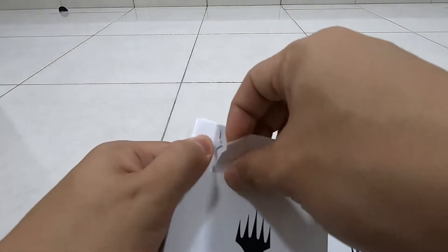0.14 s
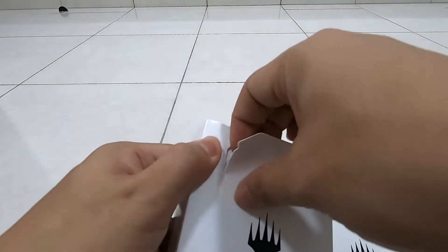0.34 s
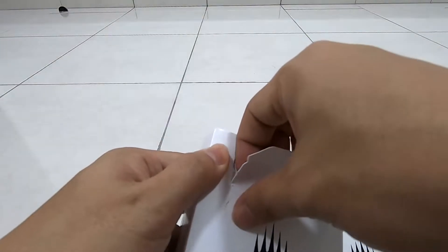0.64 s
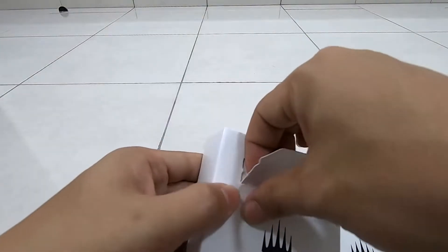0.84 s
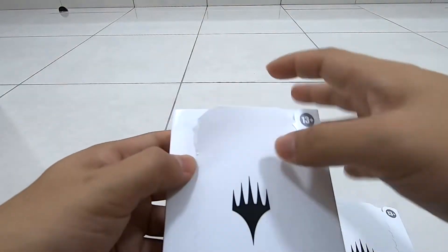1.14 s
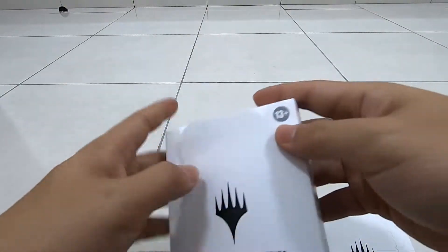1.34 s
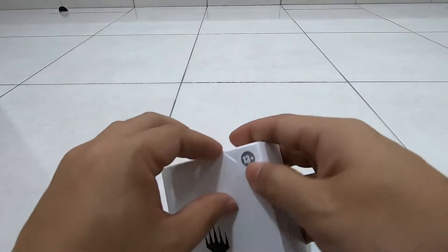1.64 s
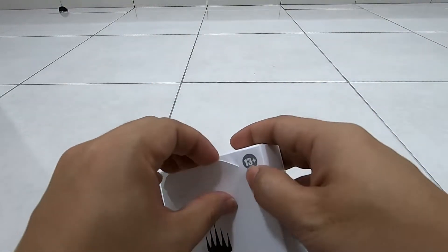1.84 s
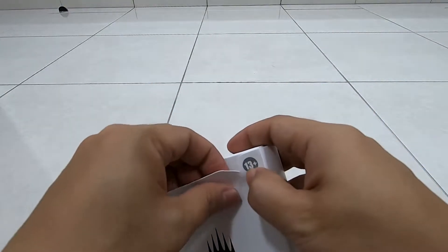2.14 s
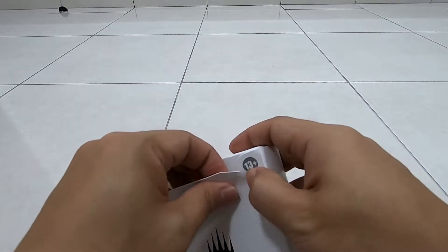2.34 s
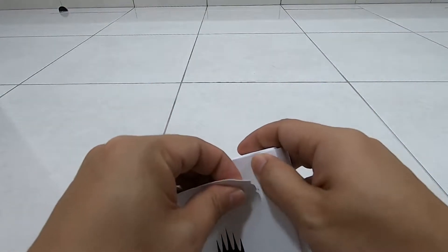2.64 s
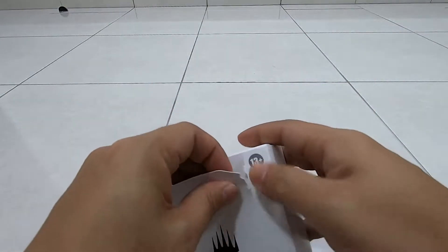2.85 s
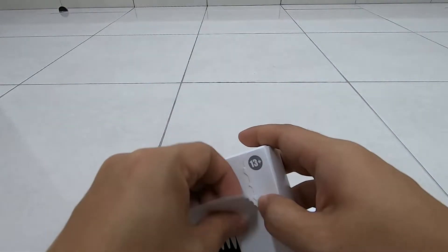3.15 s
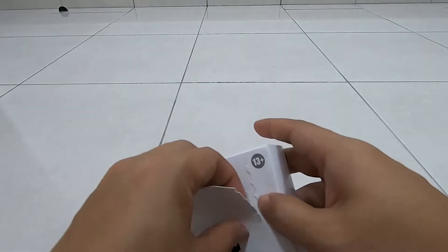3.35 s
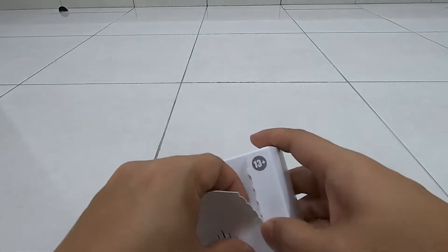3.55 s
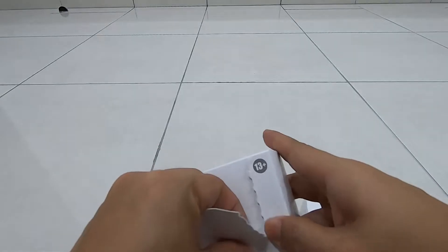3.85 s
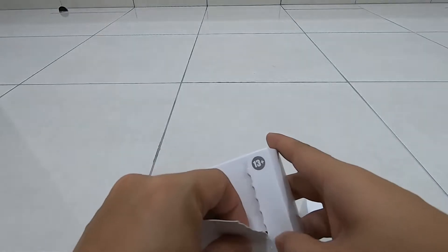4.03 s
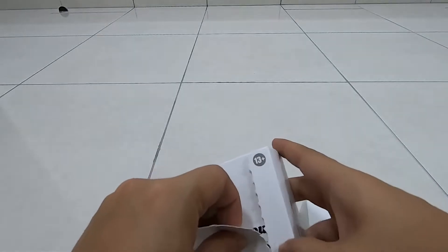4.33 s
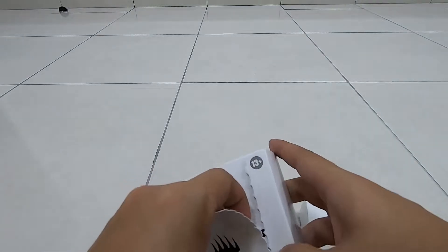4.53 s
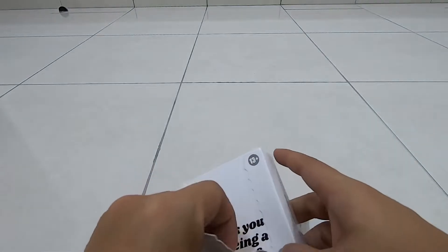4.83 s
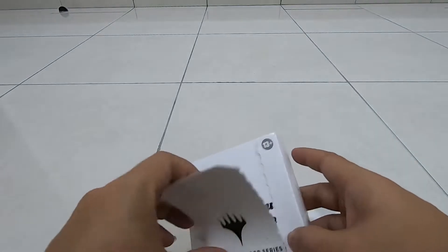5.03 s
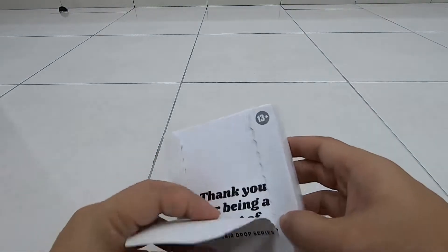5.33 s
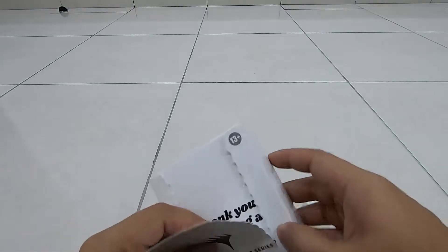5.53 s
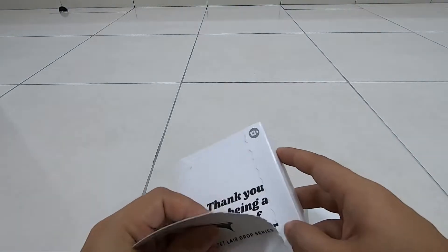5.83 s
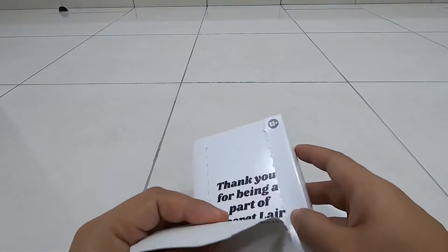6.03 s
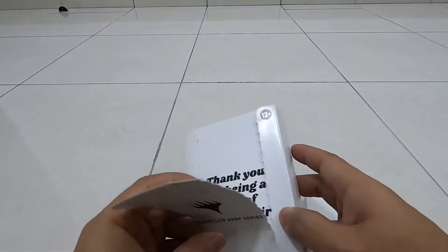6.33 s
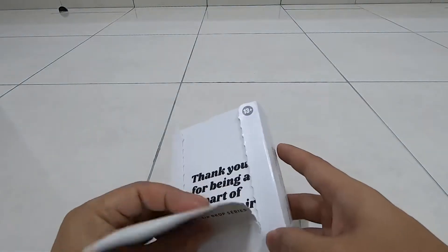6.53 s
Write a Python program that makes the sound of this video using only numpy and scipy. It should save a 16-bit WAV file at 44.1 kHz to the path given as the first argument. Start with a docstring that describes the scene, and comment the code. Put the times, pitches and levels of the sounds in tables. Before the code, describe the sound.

Hands tear a thin cardboard box open very close to the microphone in a tiled room. A rip at the start, another near one second, then fiddling and light ticks. From two and a half seconds, sharp snaps come in irregular clusters, the loudest distorting, with papery peeling, hollow thumps and bright short echoes over low hum.

```python
"""Tearing a cardboard box open

Two hands tear a thin cardboard box open along its perforation, close to a microphone in a tiled room.
Each paper tie breaks with a short burst of noise; decaying tones ring the flap and thump the box.
The loudest snaps overload the microphone. Between them, grainy noise makes fingers rub and plies peel,
small cracks make ticks, and a narrow band of noise makes the box groan, over a low room hum."""
import sys
import numpy as np
from scipy import signal
from scipy.fft import rfft, irfft
from scipy.io import wavfile
from scipy.ndimage import uniform_filter1d

SR = 44100
rng = np.random.default_rng(int(sys.argv[2]) if len(sys.argv) > 2 else 0)


def to_wav(s):
    """Save 16-bit WAV."""
    ch = np.atleast_2d(s).T  # columns
    pcm = np.round(np.clip(ch, -1, 1) * 32767)  # PCM
    wavfile.write(sys.argv[1], SR, pcm.astype(np.int16))


N = 294588  # length of the scene in samples


def amp(db):
    """Turns decibels into a plain gain."""
    return 10 ** (np.asarray(db) / 20)


def evened(x):
    """Scales a signal to an rms of 1."""
    return x / np.sqrt(np.mean(x ** 2) + 1e-20)


def read(points, hz):
    """Reads a curve between its points, along a logarithmic frequency scale."""
    f, value = np.transpose(points)
    return np.interp(np.log(hz + 1), np.log(f + 1), value)


def add(mix, s, sound):
    """Lays a sound into the mix at s seconds, cutting what runs past the end."""
    part = mix[max(round(s * SR), 0):][:len(sound)]
    part += sound[:len(part)]


def treble_octaves(hz):
    """Distance from 6 kHz in octaves, held still below 2.5 kHz and above 14 kHz."""
    return np.log2(np.clip(hz, 2500, 14000) / 6000)


def coloured(x, spectrum, tilt_db=0):
    """Gives x a spectrum, tilted by tilt_db an octave in the treble; rms 1."""
    hz = np.fft.rfftfreq(len(x), 1 / SR)
    gain = amp(read(spectrum, hz) + tilt_db * treble_octaves(hz))
    return evened(irfft(rfft(x) * gain, len(x)))


def white(size):
    """Noise with equal strength at every frequency."""
    phase = 2 * np.pi * rng.random(size // 2 + 1)
    return evened(irfft(np.exp(1j * phase), size))


def drift(hz):
    """Slow random wandering of rms 1, mostly below the given frequency."""
    f = np.fft.rfftfreq(N, 1 / SR)
    return evened(irfft(rfft(white(N)) / (1 + (f / hz) ** 4), N))


def pushes(rows, swell_s, fade_s):
    """Gain of a series of hand movements: each swells, holds for its length, then dies away."""
    t = np.arange(N) / SR
    power = np.zeros(N)
    for start, length, db in rows:
        attack = np.clip((t - start) / swell_s, 0, 1)
        release = np.exp(-np.maximum(t - start - length, 0) / fade_s)
        power += (amp(db) * attack * release) ** 2
    return np.sqrt(power)


def crackle(per_s, spread_db, length, hiss):
    """Fibres catch and pop in tiny bursts of uneven size over a little hiss; rms 1."""
    size_db = spread_db * np.minimum(rng.exponential(1, N), 3)
    pops = (rng.random(N) < per_s / SR) * amp(size_db)
    bursts = signal.lfilter([1], [1, -np.exp(-1 / (length * SR))], pops)
    return evened((evened(bursts) + hiss) * rng.standard_normal(N))


def ring(modes, size=4096, rise=0.0013):
    """Several tones start together and die away, as a struck body does."""
    t = np.arange(size) / SR
    swing = sum(amp(db - 60 * t / t60) * np.sin(2 * np.pi * hz * t) for hz, db, t60 in modes)
    return swing * (1 - np.exp(-t / rise))


# Balance of the room noise. Each row: frequency in Hz, relative level in dB.
HUM = [(12, -20), (20, -7), (38, -1.5), (58, 1.5), (80, -8), (107, -10), (204, -8), (356, -20), (387, -25),
       (421, -18.5), (1610, -34.5), (2070, -37.5), (4410, -49.5), (8880, -56), (12100, -42), (16000, -41.5)]
HUM_DB = -36.5  # rms level of that noise
# Steady tones in the room. Each row: frequency in Hz, rms level in dB before it wavers.
DRONE = [(56, -49), (117, -46.5), (153, -48), (265, -52), (355, -56.5), (469, -56.5), (596, -65)]


def hum(waver=0.63, flutter=0.4):
    """Low room noise with a few tones that waver in pitch and loudness, as of a fan."""
    t = np.arange(N) / SR
    tones = np.zeros(N)
    for hz, db in DRONE:
        loudness = amp(db) * (1 + flutter * drift(6.4))
        tones += loudness * np.sin(2 * np.pi * hz * t + waver * drift(10.0))
    return amp(HUM_DB) * coloured(white(N), HUM) + np.sqrt(2) * tones


# Hands shoving the box as they change grip.
# Each row: start in seconds, length in seconds, rumble level in dB.
JOSTLE = [(2.66,.31,-30), (5.04,0.17,-26.5), (5.26,0.04,-26.5)]
JOSTLE_SWELL_S, JOSTLE_FADE_S = 0.021, 0.014


def jostle(top_hz=50):
    """Slow pushes of the hands arrive as a deep rumble."""
    band = signal.butter(2, [14, top_hz], "band", fs=SR, output="sos")
    rumble = evened(signal.sosfilt(band, white(N)))
    return rumble * pushes(JOSTLE, JOSTLE_SWELL_S, JOSTLE_FADE_S)


# Balance of sliding card, also used for straining fibres. Each row: frequency in Hz, relative level in dB.
SLIDE = [(100, -4), (600, 3.5), (1600, -5.5), (3200, -3), (4500, -1.5), (7300, 2.5), (9500, -9),
         (12500, -2.5), (16000, -11)]
# Strokes of fingers and card sliding over each other.
# Each row: start in seconds, length in seconds, level in dB.
RUB = [(.01,0.2,-34), (.775,0.019,-46), (1.29,0.085,-43), (1.64,0.13,-56.5), (2.01,0.11,-42.5),
       (2.28,0.24,-45), (2.62,.3,-47), (3.21,0.19,-34), (3.8,0.51,-44), (4.73,0.42,-42.5),
       (5.36,0.49,-57.5), (5.64,0.13,-45.5), (5.95,0.27,-41), (6.41,0.27,-56), (6.57,0.16,-52.5)]
RUB_SWELL_S, RUB_FADE_S, RUB_REST_DB = 0.031, 0.02, -59  # the resting grip still whispers


def rub(uneven_db=2.5):
    """Skin and card slide with a fine, bright grain."""
    grain = crackle(per_s=500, spread_db=3.5, length=0.0014, hiss=1.0)
    pressure = pushes(RUB, RUB_SWELL_S, RUB_FADE_S) + amp(RUB_REST_DB)
    return coloured(grain, SLIDE) * pressure * amp(uneven_db * drift(36.0))


# The box groans as the flap is bent back.
# Each row: start in seconds, length in seconds, level in dB.
GROAN = [(3.21,0.085,-41), (4.0,0.34,-47), (6.03,0.21,-31.5)]
GROAN_SWELL_S, GROAN_FADE_S = 0.0067, 0.024


def groan(hz=275, width_hz=70):
    """Slipping card keeps a low mode of the box sounding: noise through two narrow filters."""
    b, a = signal.iirpeak(hz, hz / width_hz, SR)
    once = signal.lfilter(b, a, white(N))
    twice = signal.lfilter(b, a, once)
    return evened(twice) * pushes(GROAN, GROAN_SWELL_S, GROAN_FADE_S)


# Balance of a cracking burst. Each row: frequency in Hz, relative level in dB.
CRACK = [(100, -30), (400, 0.5), (680, -21.5), (900, -0.5), (1400, -1.5), (1900, 2), (3100, -3), (4300, 3),
         (5600, 2), (7200, 5.5), (9300, -4), (11500, 0), (14000, -5.5), (16000, -14)]


def crack(db, tilt_db, length, size=1024, rise=0.00016):
    """Fibres part in a burst of a few milliseconds that ends quickly."""
    t = np.arange(size) / SR
    shape = (1 - np.exp(-t / rise)) / (1 + (t / length) ** 4)
    return amp(db) * coloured(white(size), CRACK, tilt_db) * shape


# Modes of the flap. Each row: multiple of its pitch, relative level in dB, time to fall 60 dB in seconds.
FLAP = [(1, 3, 0.013), (.88, -1.5, 0.0046), (.66, -15, 0.0061), (.46, -4, 0.0047)]


def flap_ring(pitch):
    """The card rings at its pitch and a few lower tones."""
    return ring([(pitch * multiple, db, t60) for multiple, db, t60 in FLAP])


# Balance of the box's noise. Each row: frequency in Hz, relative level in dB.
BOX = [(60, -21), (150, -13), (250, 0), (350, -4), (480, -19.5), (700, -21), (1500, -26), (4000, -67)]
# Modes of the box. Each row: frequency in Hz, relative level in dB, time to fall 60 dB in seconds.
CAVITY = [(280, -4, 0.033), (355, -1, 0.033), (177, -14, 0.026), (503, -8, 0.021)]


def thump(db, size=4096, lag=0.00214, ring_db=3, flutter_db=-8, flutter_s=0.0079):
    """The released wall pumps the box; the grip changes its pitch a little each time."""
    t = np.arange(size) / SR
    grip = 1 + 0.0077 * rng.uniform(-1.1, 1)
    modes = ring([(hz * grip, d, t60) for hz, d, t60 in CAVITY], size=size)
    flutter_shape = np.exp(-t / flutter_s) * (1 - np.exp(-t / 0.0048))
    flutter = coloured(white(size), BOX) * flutter_shape
    sound = amp(db) * (amp(ring_db) * modes + amp(flutter_db) * flutter)
    return np.pad(sound, (round(lag * SR), 0))  # the thump comes a little late


# Faint ticks that come by chance while the box is held; the spread applies to level and tilt
FAINT_COUNT, FAINT_DB, FAINT_SPREAD_DB, FAINT_TILT_DB, FAINT_THUMP_DB = 18, -50.5, 15, -3.5, -57


def faint_ticks():
    """Rows like those of TICKS, one at a random moment in each stretch of time."""
    when, force, tilt = rng.random((FAINT_COUNT, 3)).T
    times = (np.arange(FAINT_COUNT) + when) / FAINT_COUNT * N / SR
    levels = FAINT_DB + FAINT_SPREAD_DB * (2 * force - 1)
    tilts = FAINT_TILT_DB + FAINT_SPREAD_DB * (2 * tilt - 1)
    return [(s, db, tilt_db, FAINT_THUMP_DB) for s, db, tilt_db in zip(times, levels, tilts)]


# The clearer ticks of bending card and fingers. Each row: time in seconds, crack level in dB,
# treble tilt in dB an octave, box thump in dB; ticks() and thump() trim these levels.
TICKS = [(0.018,-29,7,-33), (0.295,-29.5,-9.5,-68), (0.334,-32.5,4,-61), (0.798,-39,-11,-55),
         (1.043,-25,-18,-23), (1.114,-27.5,-23,-21.5), (1.313,-41,-14,-44), (1.661,-37.5,-21,-60),
         (1.716,-29,-11.5,-21), (1.756,-35,-10,-47), (2.028,-20,-11,-28), (2.115,-31,1.5,-47),
         (2.344,-26.5,-1.5,-32), (2.409,-36,-1,-45), (2.453,-20.5,-1.5,-30.5), (2.487,-29,-4,-68),
         (2.531,-25,-3,-30), (2.862,-25,-4,-24), (3.069,-33.5,-8.5,-61), (3.415,-19,-3,-17),
         (3.493,-31.5,-1,-78), (3.578,-30.5,-2,-31), (3.684,-36,0,-56), (4.052,-29,3,-51),
         (4.173,-16,9,-19.5), (4.298,-29,-7,-25.5), (4.334,-27,-2,-63), (4.415,-34,-4.5,-69),
         (4.474,-37.5,-7,-25.5), (4.612,-34,0.5,-43), (4.699,-40.5,-5,-27), (4.772,-25,-9,-16.5),
         (4.952,-24,-6,-22.5), (5.068,-21,-1.5,-43), (5.278,-35,-1,-55), (5.603,-36,-4.5,-23.5),
         (6.165,-36,0,-24.5), (6.212,-29.5,-3,-24), (6.426,-36.5,-5,-50), (6.601,-30.5,5.5,-46),
         (6.647,-36.5,5.5,-54)]


def ticks(length=0.0039, crack_db=1, flap_db=-1, uneven_db=2):
    """Creases give way and fingertips land on the box; each rings a different patch of card."""
    out = np.zeros(N)
    rows = list(TICKS) + faint_ticks()
    chances = rng.uniform(-0.85, 1, (len(rows), 2))
    for (s, db, tilt_db, thump_db), (place, force) in zip(rows, chances):
        pitch = 2150 * 2 ** (0.6 * place)
        # brighter ticks ring the card less
        patch_db = db + flap_db + uneven_db * force - max(tilt_db, 0)
        add(out, s, crack(db + crack_db, tilt_db, length))
        add(out, s, amp(patch_db) * flap_ring(pitch))
        add(out, s, thump(thump_db))
    return out


# Balance of the peeling plies. Each row: frequency in Hz, relative level in dB.
PLIES = [(100, -13), (500, 5.5), (750, -3.5), (1600, 1.5), (2600, -6), (4400, 1.5), (5800, 0.5),
         (7300, 1.5), (9500, -6.5), (12000, -6), (16000, -31)]
# Stiff edge of the card, set ringing by the parting plies.
# Each row: frequency in Hz, width in Hz, relative level in dB.
EDGE = [(4350, 260, -15), (7180, 120, -4)]
# Paper plies peeling apart between the ties.
# Each row: start in seconds, length in seconds, level in dB.
PEEL = [(.075,0.12,-30), (.94,.16,-29.5), (2.505,0.017,-39), (2.643,0.031,-29), (2.705,0.049,-35),
        (3.22,0.084,-27.5), (4.11,0.14,-45), (4.795,0.023,-19.5), (5.02,0.083,-36.5), (5.858,0.1,-30.5),
        (6.005,0.079,-26.5)]
PEEL_SWELL_S, PEEL_FADE_S = 0.0043, 0.011


def peel(uneven_db=3):
    """Plies of paper part with a coarse crackle that makes the torn edge sing faintly."""
    grain = crackle(per_s=400, spread_db=7.5, length=0.0009, hiss=0.55)
    sing = np.zeros(N)
    for hz, width, db in EDGE:
        b, a = signal.iirpeak(hz, hz / width, SR)
        sing += amp(db) * signal.lfilter(b, a, grain)
    movement = pushes(PEEL, PEEL_SWELL_S, PEEL_FADE_S)
    return coloured(grain + sing, PLIES) * movement * amp(uneven_db * drift(40))


def strain(db, tilt_db, size=1024):
    """Single fibres give way, louder and louder, just before a snap."""
    time_left = np.arange(size)[::-1] / SR
    fibres = white(size) ** 3  # cubing leaves a few sparse peaks
    return amp(db) * coloured(fibres, SLIDE, tilt_db) * np.exp(-time_left / .0028)


# Snaps of breaking ties, and a faint tick with a small squeak at 0.644 s.
# Each row: time in seconds, crack level in dB, treble tilt in dB an octave, flap pitch in Hz,
# flap ring in dB, box thump in dB, share sent to the snap echoes in dB; the functions trim these levels.
SNAPS = [(0.053,-11,-4.5,880,-15.5,-10.5,-5), (0.0768,-6.5,0.5,1816,-3,-11.5,-14.5),
         (0.082,-9.5,-0.5,2460,-13,-36,-3), (0.644,-36.5,-2,4230,-29,-33,-7),
         (.9535,-10.5,-11,923,-15,-44,-1), (.954,-8.5,6,1640,-10.5,-24,-3.5),
         (2.031,-20,-4,1870,-31,-23,-13), (2.5,-19,-3.5,1860,-17,-34.5,-2.5), (2.66,-6,2,1750,-8.5,-18,-3),
         (2.6995,-11.5,1.5,1644,-5.5,-13.5,-0.5), (2.7004,-7.5,-44,2450,-0.5,-31,-4.5),
         (2.87,-29.5,-5,2560,-17,-45,-7), (3.1914,-8,3,1844,-4,-6.5,-8.5), (3.2077,2.5,-6.5,2590,0,-6,-4.5),
         (3.2349,-11,16,3730,-13.5,-23.5,0), (3.806,-5.5,-2,1810,-6,-10.5,0),
         (3.8399,-6.5,-11,1900,0.5,-13,0.5), (4,-20.5,-6,2050,-21,-16,-2.5),
         (4.122,0.5,-1.5,1847,1.5,-22.5,2), (4.794,-4,0.5,2750,-3.5,-7.5,4), (4.8,-9,-14.5,1730,-1.5,-21,1),
         (4.832,-8,-4.5,1750,-29,-8,2.5), (4.888,-7,-4,1830,-9.5,-34,0.5), (5.8508,-0.5,-2,1720,-5,-20,3),
         (5.877,-13,-2.5,4420,-13.5,-12,0), (6.0058,-7,0,2630,-15,-7.5,4.5),
         (6.051,-7.5,-3.5,2760,-8,-16,-0.5), (6.1068,-10.5,2.5,1730,-37,-7,0.5)]
SNAP_S = 0.0033  # how long a crack lasts


def snaps(crack_db=3, flap_db=9, strain_db=-16, flap_lag=.0004):
    """Each row strains, cracks, rings the flap and thumps the box; returns card and box apart."""
    card, box = np.zeros((2, N))
    for s, db, tilt_db, pitch, ring_db, thump_db, _ in SNAPS:
        before = strain(db + strain_db, tilt_db)
        add(card, s - len(before) / SR, before)
        add(card, s, crack(db + crack_db, tilt_db, SNAP_S))
        add(card, s + flap_lag, amp(ring_db + flap_db) * flap_ring(pitch))
        add(box, s, thump(thump_db))
    return card, box


# How fast the tiled room dies away. Each row: frequency in Hz, time to fall 60 dB in seconds.
ROOM_T60 = [(150, 1), (500, 0.1059), (1500, 0.5617), (4000, 0.6063), (8000, 0.5), (15000, .5)]
# Colour of the tiled room. Each row: frequency in Hz, relative level in dB.
ROOM_COLOUR = [(100, 6.5), (300, 5.5), (700, 8.5), (1700, -1.5), (3500, -2), (7000, -1), (10000, 0),
               (16000, 4)]


def room(x, gap=0.0021, build=0.0026):
    """Dense reflections from hard walls, each band dying at its own speed."""
    hz, t, z = signal.stft(white(SR), SR, nperseg=256)
    z = z * amp(read(ROOM_COLOUR, hz)[:, None] - 60 * t / read(ROOM_T60, hz)[:, None])
    tail = signal.istft(z, SR, nperseg=256)[1][:SR]
    # silence for a short gap, then the reflections build up
    tail = tail * (1 - np.exp(-np.maximum(np.arange(SR) / SR - gap, 0) / build))
    return signal.fftconvolve(x, tail / np.linalg.norm(tail))[:N]


def smooth_chance(shape, bands, frames):
    """A random map of rms 1, smoothed over neighbouring bands and moments."""
    across = uniform_filter1d(rng.standard_normal(shape), size=bands, axis=0)
    return evened(uniform_filter1d(across, size=frames, axis=1))


# What the card sends out in all directions. Each row: frequency in Hz, relative level in dB.
RADIATED = [(150, -16.5), (450, -12), (700, -19.5), (950, -15.5), (1400, 9.5), (1900, 3), (3100, 5.5),
            (4300, 7), (5600, 4.5), (7400, 10.5), (9300, -2), (11700, 3.5), (14000, -3), (16000, -10)]
HUMP_OCTAVES = .27  # half width of the hump that the flap leaves in the room's tail


def snap_echoes(crack_db=-18, flap_db=-20, gap=0.008, build=0.0014, patchy_db=3.0, ridge_db=1.34):
    """The room gathers each snap from all directions: a diffuse tail with a hump where the flap rings."""
    hz, t, z = signal.stft(white(N), SR, nperseg=256, noverlap=192)
    power = np.zeros(z.shape)
    for s, db, tilt_db, pitch, ring_db, _, send_db in SNAPS:
        hiss = evened(amp(read(RADIATED, hz) + tilt_db * treble_octaves(hz)))
        hiss = amp(db + send_db + crack_db) * hiss
        hump = np.zeros(len(hz))
        for multiple, mode_db, _ in FLAP:
            octaves_away = np.log2((hz + 1) / (pitch * multiple))
            hump += amp(mode_db) / (1 + (octaves_away / HUMP_OCTAVES) ** 2)
        hump = amp(ring_db + send_db + flap_db) * evened(hump)
        live = (t > s + gap) & (t < s + 1)
        age = t[live] - s - gap
        fade = amp(-60 * age / read(ROOM_T60, hz)[:, None]) * (1 - np.exp(-age / build))
        power[:, live] += (hiss ** 2 + hump ** 2)[:, None] * fade ** 2
    patches = smooth_chance(z.shape, bands=12, frames=4)
    # reflections that reinforce each other leave narrow, lasting ridges in the tail
    ridges = smooth_chance(z.shape, bands=2, frames=50)
    z = z * np.sqrt(power) * amp(patchy_db * patches + ridge_db * ridges)
    return signal.istft(z, SR, nperseg=256, noverlap=192)[1][:N]


def slight_width(mid, width_db=-39, treble_db=-27, lag=.0007):
    """Almost mono: the two channels part only slightly in phase, most in the treble."""
    late = np.roll(mid, round(lag * SR))
    treble = np.diff(np.diff(late, prepend=0), prepend=0) / 2
    quarter_turn = signal.hilbert(mid).imag  # every tone shifted by a quarter cycle
    side = amp(width_db) * quarter_turn + amp(treble_db) * treble
    return np.array([mid + side, mid - side])


def scene(card_send_db=-12, box_send_db=-9, small_send_db=-7, echoes_db=-2):
    """The box close by, and the room behind it."""
    background = hum() + jostle()
    small = ticks() + rub() + peel()
    card, box = snaps()
    walls = room(amp(card_send_db) * card + amp(box_send_db) * box + amp(small_send_db) * small)
    echoes = amp(echoes_db) * snap_echoes()
    return slight_width(background + small + groan() + card + box + walls + echoes)


def record(dry, edge_hz=16000):
    """The loudest snaps clip flat just below full scale; then a filter removes the top treble."""
    clipped = np.clip(dry, -.96, .96)
    lowpass = signal.firwin(255, edge_hz, window=("kaiser", 8), fs=SR)
    return signal.oaconvolve(clipped, lowpass[None], "same")


dry = scene()
out = record(dry)
to_wav(out)
```